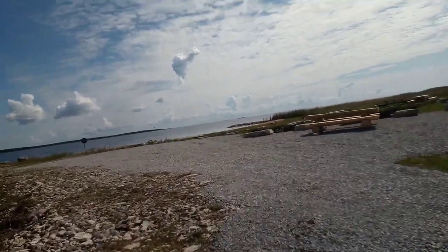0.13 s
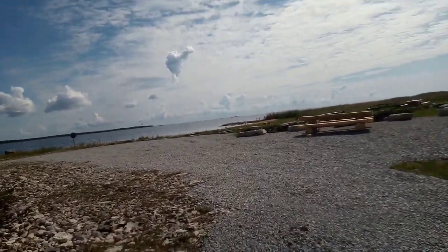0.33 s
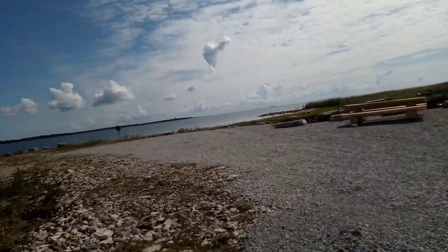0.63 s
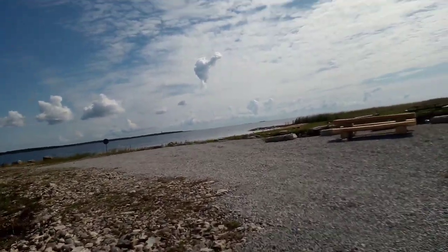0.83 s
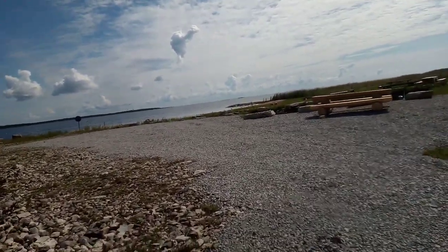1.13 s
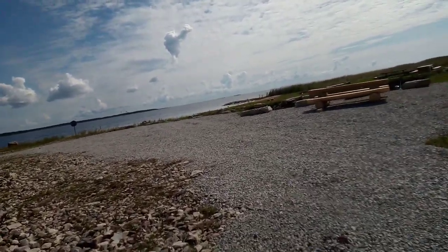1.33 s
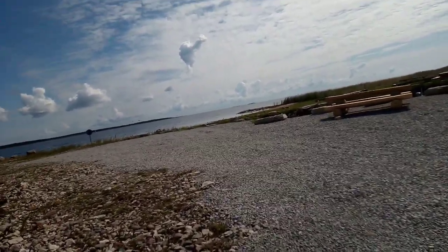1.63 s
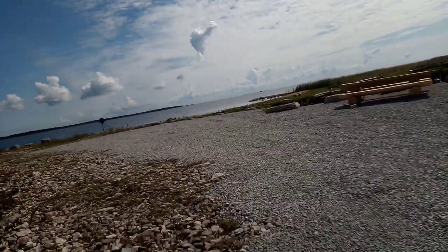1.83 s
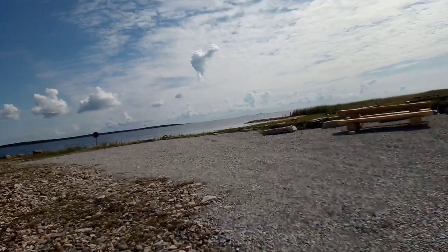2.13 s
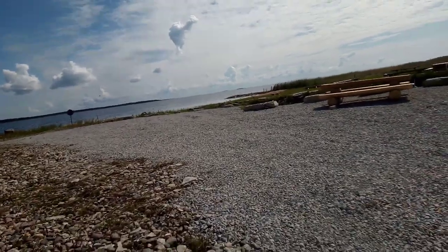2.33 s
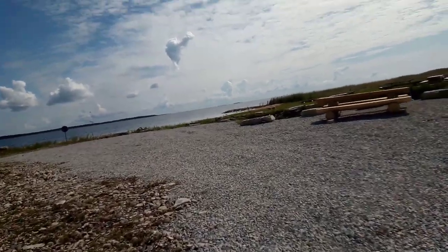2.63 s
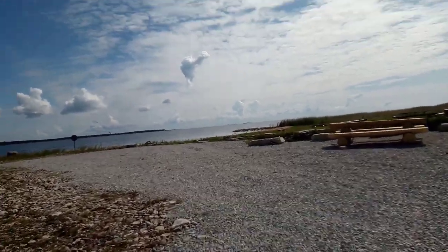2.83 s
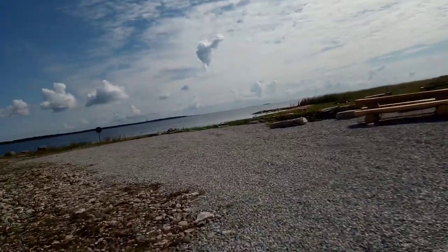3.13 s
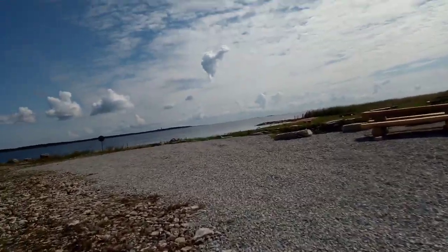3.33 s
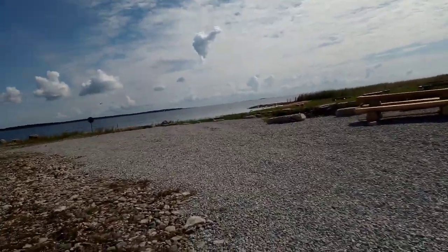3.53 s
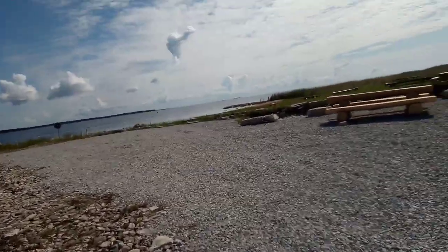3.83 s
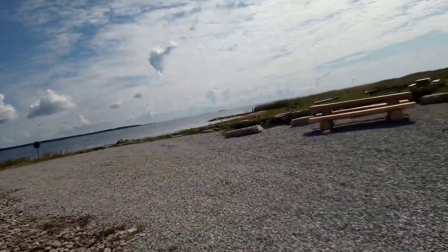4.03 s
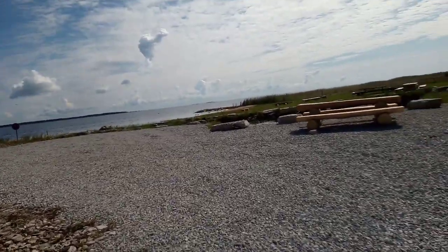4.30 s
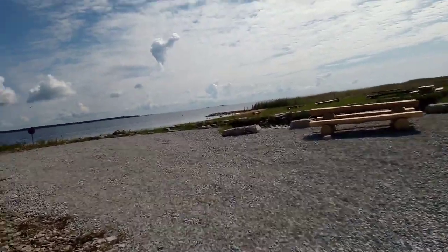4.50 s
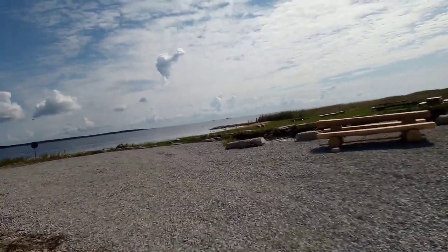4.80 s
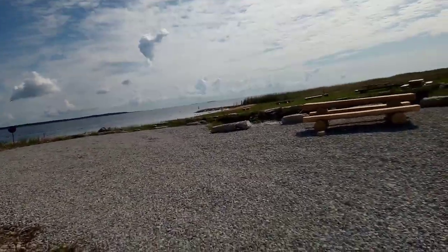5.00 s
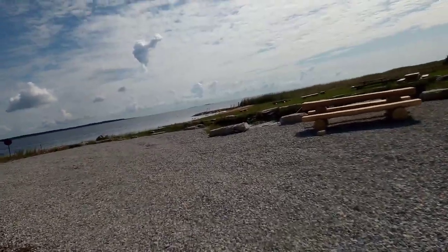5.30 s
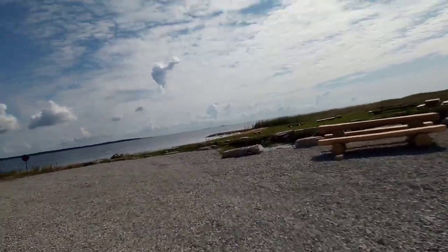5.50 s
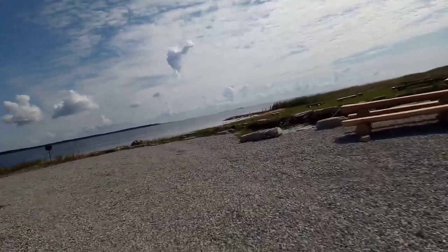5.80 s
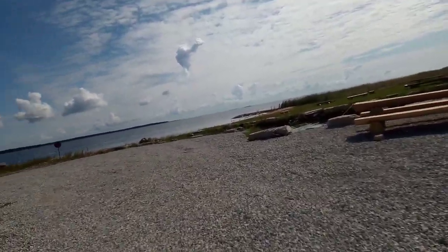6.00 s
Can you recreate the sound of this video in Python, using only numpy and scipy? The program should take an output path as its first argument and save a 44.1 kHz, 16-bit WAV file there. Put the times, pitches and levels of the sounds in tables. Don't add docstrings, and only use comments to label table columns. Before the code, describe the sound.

Gulls cry hoarsely almost without pause over a windy shore while someone walks on crunching gravel and wind thumps the microphone.

```python
import sys
import numpy as np
from scipy import signal
from scipy.fft import rfft, irfft
from scipy.io import wavfile
from scipy.ndimage import uniform_filter1d

SR = 44100
rng = np.random.default_rng(int(sys.argv[2]) if len(sys.argv) > 2 else 0)


def volts(x):
    e = np.asarray(x, float) / 20
    return 10 ** e


def inscribe(sig):
    pcm = np.round(np.clip(np.atleast_2d(sig).T, -1, 1) * 32767)
    wavfile.write(sys.argv[1], SR, pcm.astype(np.int16))


N = 271215

# (frequency [Hz], level [dB])
THROAT = [(700, -38.5), (1050, -13), (1500, -1), (1800, -1), (2250, -4), (2750, -17), (3400, -41),
          (4000, -20.5), (4500, -13), (5200, -20), (5800, -22), (6800, -25.5), (8000, -51.5), (10000, -68)]
PARTIALS_DB = [-1, 4.5, -4, -10, 2.5, -4, -3, -2, -3]
RATTLE_HZ, RATTLE_DEPTH, WAVER = 62, .62, -.016
SECOND_HZ, SECOND_DEPTH = 260, .4
BREATH_DB = -5
DIVE_S, BEAK_LAG_DB, BEAK_OPENS_S, BEAK_SHUTS_DB_S = .09, 8, .025, 16

# (start [s], length [s], top pitch [Hz], level [dB], beak opening [dB])
QUICK = [
    (.52, 0.5, 1060, -52.5, 9),
    (3.195, 0.42, 1056, -55.5, 11),
    (3.59, 0.14, 839, -58.5, 14.5),
    (5.7, 0.27, 898, -53, -6),
]
SLOW = [
    (1.9, 0.51, 1029, -54, 11),
    (3.8, 0.35, 1036, -60, -17),
    (4.43, 0.184, 829, -56, -0.5),
    (5.97, 0.25, 872, -52, 6.5),
]
GENTLE = [(1.2, 0.17, 990, -59.5, 9), (1.4, 0.27, 860, -68.5, -4.5), (1.89, 0.207, 880, -60, 13.5),
          (4.59, .2, 975, -55, 4.5), (2.38, 0.12, 700, -65, -11.5), (2.57, 0.088, 900, -58, 4),
          (3.19, 0.23, 803, -61.5, 11.5), (5.48, 0.074, 790, -65, -23), (4.07, 0.23, 1066, -58.5, 19),
          (4.72, 0.18, 895, -55, 10), (2.91, 0.087, 1070, -63.5, 4), (4.98, .17, 840, -55.5, -7),
          (5.25, 0.089, 1046, -73.5, 22), (4.28, .11, 1040, -62, 20), (5.49, .24, 1100, -64, -24)]
ARCHING = [
    (3.61, 0.15, 995, -58.5, 16.5),
    (1.07, 0.273, 1060, -52, 4.5),
    (5.13, .21, 960, -56, -8.5),
    (5.84, 0.25, 883, -57, 14),
]
DIVING = [
    (2.4, 0.18, 1070, -55, 3),
    (2.67, .3, 1090, -59, 9),
    (3.66, 0.36, 1040, -55, -2),
    (4.44, 0.17, 1130, -49.5, -4),
]
LEVEL = [(.72, 0.39, 1146, -60, 9), (2.1, 0.53, 790, -68, 13.5), (2.5, 0.24, 1157, -59.5, 8),
         (1.08, .17, 1340, -63, 17), (3.74, .14, 920, -63, 14), (4.74, .3, 920, -62, 14),
         (4.18, 0.25, 1081, -55, 9.5), (4.12, 0.33, 761, -61.5, 3), (4.88, .28, 1042, -59.5, 4.5),
         (5.76, 0.28, 968, -55, 3), (5.9, 0.32, 1202, -54, 1)]
MANNERS = [
    (QUICK, dict(climb_s=.05, climb_hz=300, dive_hz=45, sag_hz_s=300, droop_hz_s2=50,
                 swell_db_s=8, hoarse=.26)),
    (ARCHING, dict(climb_s=.09, climb_hz=80, dive_hz=3, sag_hz_s=30, droop_hz_s2=8000,
                   swell_db_s=-3, hoarse=.25)),
    (SLOW, dict(climb_s=.15, climb_hz=95, dive_hz=5, sag_hz_s=330, droop_hz_s2=400,
                swell_db_s=8, hoarse=.3)),
    (GENTLE, dict(climb_s=.045, climb_hz=15, dive_hz=5, sag_hz_s=370, droop_hz_s2=50,
                  swell_db_s=15, hoarse=.28)),
    (DIVING, dict(climb_s=.015, climb_hz=5, dive_hz=220, sag_hz_s=120, droop_hz_s2=50,
                  swell_db_s=-6, hoarse=.22)),
    (LEVEL, dict(climb_s=.06, climb_hz=40, dive_hz=5, sag_hz_s=60, droop_hz_s2=200,
                 swell_db_s=3, hoarse=.65))]

# (time [s], peak level [dB], strongest partial [Hz])
CHATTER = [(4.148, -52, 1450), (4.19, -53, 1440), (4.235, -52, 1404), (4.315, -47, 1460), (4.34, -49, 1400),
           (4.364, -46, 1397), (4.39, -49, 1420), (4.434, -42, 1473), (4.475, -50, 1600),
           (4.525, -51, 1550), (4.555, -50, 1586)]
# (time [s], peak level [dB], strongest partial [Hz])
CHUCKLE = [
    (4.7558, -40, 1500),
    (4.7762, -42, 1590),
    (4.7962, -41, 1730),
    (4.8175, -40, 1735),
    (4.8583, -38.5, 1774),
    (4.878, -38, 1750),
]
NOTE_S, NOTE_DB = 0.024, -7
# (time [s], level [dB])
COLONY = [(0, -52), (.24, -70), (.36, -62), (.43, -84), (.58, -54), (1.44, -53), (1.64, -66), (1.87, -83),
          (1.92, -51), (2.55, -52), (3.0, -62), (3.15, -87), (3.22, -51), (5.05, -52), (5.36, -72),
          (5.5, -63), (5.68, -67), (5.79, -50)]
# (start [s],
# end [s], start pitch [Hz], end pitch [Hz], level [dB])
PEEPS = [
    (1.49, 1.58, 616, 595, -71),
    (1.63, 1.724, 536, 475, -63.5),
    (1.812, 1.88, 4070, 4130, -81),
    (4.0, 4.12, 4120, 4220, -58.5),
    (4.09, 4.32, 1060, 940, -63),
    (3.63, 3.97, 1110, 1060, -66),
    (5.488, 5.51, 1600, 1560, -60),
    (5.52, 5.56, 800, 760, -74),
]

# (frequency [Hz], level [dB per Hz])
WIND_SPECTRUM = [(15, -50), (25, -49), (63, 3.5), (147, 3), (315, -6.5), (393, -23.5), (506, -25),
                 (632, -37.5), (895, -67), (1100, -85.5), (1430, -61), (2420, -120)]
# (time [s], peak level [dB], rise [s], fall [s])
GUSTS = [(0, -51.5, .1, 0.57), (0.262, -47.5, 0.069, 0.67), (0.648, -24, 0.088, 0.15),
         (0.859, -38, 0.28, 0.06), (1.08, -42, 0.16, 0.096), (1.25, -43, 0.035, 0.28),
         (1.381, -26.5, 0.13, 0.056), (1.436, -27, 0.16, 0.013), (1.545, -40, 0.12, 0.16),
         (1.86, -49, 0.67, 0.35), (2.02, -40.5, 0.21, 0.25), (2.14, -41.5, 0.24, 0.23),
         (2.292, -41, 0.26, 0.073), (2.622, -37.5, 0.12, 0.7), (2.838, -20.5, 0.025, 0.045),
         (3.044, -28, 0.26, 0.054), (3.45, -32.5, 0.21, 0.048), (3.579, -26.5, 0.045, 0.07),
         (3.77, -35.5, 0.88, 0.9), (4.18, -34.5, 0.16, 0.29), (4.441, -37.5, 0.27, 0.28),
         (4.59, -36, 0.0155, 0.22), (4.71, -31.5, 0.018, 0.019), (4.854, -29.5, 0.27, 0.16),
         (5.02, -30.5, 0.12, 0.022), (5.138, -34, 0.51, 0.29), (5.39, -38.5, 0.1, 0.038),
         (5.679, -33, 0.25, 0.26), (5.948, -33.5, 0.42, 0.061), (6.059, -42.5, 0.02, 0.18)]
CALM_DB, SHARP_AT_DB, SHARP_PER_DB = -67, -29, 1
# (time [s], added sharpness [dB])
SLAPS = [(.65, -1), (1.388, 4.5), (2.2, -10), (2.84, 3.5), (3.25, 2), (4.69, 15.5), (4.802, 12.5),
         (4.854, 8), (4.985, 11), (5.07, 6), (5.125, 2), (3.85, 0.5), (4.2, -0.5), (5.02, 2.5), (5.53, 2),
         (5.685, 18), (5.726, 8), (5.62, 4), (6.03, 37)]
SLAP_S = 0.027
# (time [s], peak level [dB], swing [Hz])
THUMPS = [(0.614, -19, 222), (0.649, -16, 101.3), (0.678, -21, 112), (1.064, -34, 183), (1.261, -31, 117),
          (1.292, -22.5, 125), (1.351, -19.5, 160.5), (1.374, -22, 115), (1.39, -18.5, 157),
          (1.428, -23, 116), (1.539, -33, 159), (2.127, -39.5, 172), (2.268, -32.5, 144), (2.803, -14, 153),
          (2.83, -17.5, 142), (2.913, -22, 168), (2.968, -20.5, 177), (3.027, -23.5, 174), (3.147, -31, 92),
          (3.559, -20.5, 172.5), (3.712, -25, 152), (3.75, -22.5, 125), (3.784, -26.5, 91),
          (3.816, -22.5, 153), (3.85, -18.5, 180), (4.077, -22, 142), (4.195, -21, 190),
          (4.283, -26.5, 117), (4.337, -27, 126), (4.581, -27.5, 147), (4.658, -29, 172),
          (4.697, -25.5, 136), (4.719, -21.5, 140), (4.786, -17, 176), (4.846, -14, 201), (4.87, -20, 112),
          (4.947, -29, 161), (4.978, -23, 140), (5.015, -16, 148), (5.062, -24.5, 221), (5.12, -19, 91),
          (5.168, -26, 116), (5.652, -27, 175), (5.68, -22.5, 226), (5.722, -22.5, 132), (5.782, -30.5, 92),
          (5.855, -22.5, 202), (5.909, -30, 123), (5.948, -24.5, 182), (6.022, -43, 109)]
THUMP_TURNS, THUMP_DB, THUMP_SAG = 0.61, -3, 0.15

# (frequency [Hz], level [dB per Hz])
GRIT = [(1470, -37), (2500, -46), (2770, -12), (4080, -10), (4430, -4), (5880, 3.5), (6430, 6.5),
        (7590, 1.5), (8480, -15.5), (10100, -8.5), (13000, -19.5)]
# (frequency [Hz], level [dB])
COARSE = [(450, -8), (700, -10.5), (1000, 1), (1500, 6), (2100, -3.5), (2700, -19.5), (3500, -8.5),
          (4200, -16.5), (5800, -11.5), (7500, -21.5), (8500, -45)]
# (time
# [s], length [s], coarse stones [dB], fine grit [dB], finest dust [dB])
STEPS = [(0.019, 0.055, -45, -63.5, -48.5), (0.117, 0.085, -54, -76.5, -69.5),
         (0.342, 0.063, -59.5, -97, -80), (0.784, 0.17, -54, -75.5, -71), (1.093, 0.034, -78, -71.5, -88),
         (1.404, 0.15, -54, -77.5, -66), (1.437, 0.048, -59, -75, -68), (1.517, 0.054, -57, -93, -84),
         (1.682, 0.11, -61.5, -108, -92), (1.95, 0.078, -54.5, -76, -80.5),
         (2.046, 0.087, -48.5, -74, -66.5), (2.564, 0.063, -51, -78.5, -72.5),
         (2.711, 0.1, -51, -71.5, -76), (2.984, 0.039, -55, -85, -90), (3.298, 0.067, -50, -83, -86),
         (3.34, 0.036, -41.5, -71, -84), (3.45, 0.11, -53.5, -88, -78), (4.002, 0.098, -53.5, -80.5, -97),
         (4.08, 0.071, -55.5, -81.5, -99), (4.717, 0.079, -49, -80, -80), (4.765, 0.052, -48, -73, -81),
         (4.847, 0.15, -57, -101, -90), (5.422, 0.082, -57.5, -100, -86), (5.445, 0.017, -50, -92, -90),
         (6.073, 0.12, -49.5, -85, -84)]
PRESS_SHARE, STONES_LINGER, DUST_REST_DB = 0.8, 1.19, -86
# (time [s], peak level [dB], ring [Hz], treble [dB])
DRY = [(.008, -41, 1540, -26), (0.061, -49, 1680, -40.5), (0.089, -53, 1380, -44.5),
       (0.112, -42, 1540, -45), (1.287, -63, 1760, -52.5), (1.378, -37, 760, -53), (1.94, -45, 1970, -56.5),
       (2.028, -31.5, 1110, -71), (2.561, -38, 1390, -65), (2.674, -57, 1360, -49.5),
       (2.983, -36, 1340, -40), (6.057, -27.5, 1810, -62)]
# (time [s], peak level [dB], ring
# [Hz], treble [dB])
DULL = [(0.294, -23.5, 910, -62), (0.347, -44, 1620, -69), (0.643, -33, 1770, -56.5),
        (0.768, -38, 1150, -60), (2.984, -43, 2900, -60), (3.03, -52, 1500, -80), (3.327, -28, 1700, -55),
        (1.664, -41.5, 1640, -79), (1.789, -49, 1220, -83), (2.135, -45, 1050, -73),
        (3.291, -21.5, 660, -46), (3.31, -27.5, 1700, -46), (3.334, -18.5, 1320, -48),
        (3.342, -26.5, 1520, -55), (3.351, -25, 920, -55), (.792, -32, 1020, -59),
        (1.441, -29.5, 1400, -61), (1.556, -52, 1620, -74), (6.088, -34, 765, -65), (3.431, -29, 1770, -67),
        (3.465, -39, 1970, -52), (3.988, -36.5, 1460, -46), (4.016, -31, 1420, -43.5),
        (4.664, -35.5, 1810, -52.5), (4.726, -36, 925, -34), (4.763, -32, 1580, -32.5),
        (5.378, -44, 1530, -85), (5.408, -40, 1170, -62), (5.436, -32, 680, -60), (5.607, -47, 1110, -72),
        (3.981, -46, 1400, -49), (3.996, -46, 1500, -47), (1.078, -62, 1900, -50), (1.099, -62, 1900, -50),
        (6.141, -38, 1700, -48)]
DRY_TOP_DB, DULL_TOP_DB = -3, -21
PORT_HZ = 15400

# (frequency [Hz], level [dB per Hz])
HISS = [(500, -112), (1000, -110), (1600, -107), (2500, -120), (3200, -122), (3700, -118), (4400, -122),
        (6000, -121), (7500, -126), (8500, -129), (10500, -131), (13000, -133), (15000, -127),
        (16000, -128)]


def read(points, hz):
    p = np.array(points)
    return np.interp(np.log(hz), np.log(p[:, 0]), p[:, 1])


def unit(x):
    return x / np.sqrt(np.mean(x ** 2))


def colour(x, points):
    hz = np.arange(1, 2050) * SR / 4096
    below = np.maximum(np.log2(points[0][0] / hz), 0)
    db = read(points, hz) - 30 * below - 60 * (hz > points[-1][0])
    cep = irfft(db * np.log(10) / 20)
    cep[1:2048] *= 2
    cep[2049:] = 0
    response = irfft(np.exp(rfft(cep)))[:2048]
    return signal.fftconvolve(x, response)[:len(x)]


def band(x, hz, octaves):
    edges = hz * 2 ** (np.array([-.5, .5]) * octaves)
    return signal.sosfilt(signal.butter(3, edges, "band", fs=SR, output="sos"), x)


def walk(rate, size=N):
    k = max(int(SR / rate), 1)
    held = np.repeat(rng.standard_normal(size // k + 1), k)
    return 1.3 * uniform_filter1d(uniform_filter1d(held, k), k)[:size]


def swells(s, db, rise, fall, rest_db):
    t = np.arange(0, N, 32) / SR
    power = volts(2 * rest_db)
    for s0, peak, up, down in zip(s, db, rise, fall):
        power = power + volts(2 * (peak - 20 * np.maximum((s0 - t) / up, (t - s0) / down)))
    return np.interp(np.arange(N) / SR, t, 10 * np.log10(power))


def gulls():
    near = np.zeros(N)
    for rows, manner in MANNERS:
        for s, *row in rows:
            start = int(s * SR)
            sound = cry(*row, **manner)[:N - start]
            near[start:][:len(sound)] += sound
    n = int(NOTE_S * SR)
    for s, db, hz in CHATTER + CHUCKLE:
        note = np.hanning(n) * voice(np.full(n, hz / 2), -6.0, 0.22)
        near[int(s * SR):][:n] += volts(db + NOTE_DB) * note
    crowd = 0
    for hz in (700, 800, 910, 1020):
        crowd = crowd + volts(3 * walk(4)) * voice(hz * (1 + .07 * walk(5)), -5., .5)
    colony_s, colony_db = np.transpose(COLONY)
    crowd_db = np.interp(np.arange(N) / SR, colony_s, colony_db) - 9
    out = colour(near, THROAT) + volts(crowd_db) * unit(colour(crowd, THROAT))
    t = np.arange(SR // 8) / SR
    echo = rng.standard_normal(len(t)) * np.exp(-np.log(1000) * t / .1)
    return out + volts(-32) * signal.fftconvolve(out, echo)[:N]


def cry(length, hz, db, beak_db, climb_s, climb_hz, dive_hz, sag_hz_s, droop_hz_s2, swell_db_s, hoarse):
    t = np.arange(int(length * SR)) / SR
    after = np.maximum(t - climb_s, 0)
    hz = hz - climb_hz * np.maximum(1 - t / climb_s, 0) ** 2
    hz = hz - dive_hz * (1 - np.exp(-after / DIVE_S))
    hz = hz - sag_hz_s * after - droop_hz_s2 * after ** 2
    beak_db = beak_db - BEAK_LAG_DB * np.exp(-t / BEAK_OPENS_S) - BEAK_SHUTS_DB_S * after
    edges = signal.windows.tukey(len(t), .055 / length)
    return volts(db + swell_db_s * t) * voice(hz, beak_db, hoarse) * edges


def voice(hz, beak_db, hoarse):
    n = len(hz)
    rattle_hz = RATTLE_HZ * (1 + .1 * rng.standard_normal() + .11 * walk(35, n))
    rattle = 2 * np.pi * (np.cumsum(rattle_hz) / SR + rng.random())
    second = 2 * np.pi * np.cumsum(SECOND_HZ * (1 + .2 * walk(12, n) + .25 * walk(150, n))) / SR
    waver = WAVER * np.sin(rattle) + .045 * hoarse * walk(120, n) + .006 * walk(25, n)
    turn = 2 * np.pi * np.cumsum(hz * (1 + waver)) / SR
    hoarse = hoarse + (.9 - hoarse) * np.exp(-np.arange(n) / (.018 * SR))
    air = rng.standard_normal(n)
    breath = band(air, 1700, 1.8)
    breath = breath + volts(beak_db + 2) * band(air, 5600, 1.3)
    breath = breath + volts(beak_db + 11) * band(air, 4650, .3)
    out = volts(BREATH_DB) * hoarse * breath
    for k, db in enumerate(PARTIALS_DB, 1):
        share = np.minimum(hoarse * (.5 + .14 * k), 1)
        smear_hz = 140 + 120 * k
        blur = 1 - share + share * (walk(smear_hz, n) + 1j * walk(smear_hz, n))
        open_db = beak_db * np.clip((k * hz - 2300) / 1200, 0, 1)
        level = volts(db + open_db + .2 * k * walk(15, n))
        out = out + level * np.imag(blur * np.exp(1j * k * turn))
    chop = (1 + RATTLE_DEPTH * np.cos(rattle)) * (1 + SECOND_DEPTH * np.cos(second))
    return out * chop * volts(.8 * walk(60, n))


def peeps():
    out = np.zeros(N)
    for s0, s1, hz0, hz1, db in PEEPS:
        a, b = int(s0 * SR), int(s1 * SR)
        hz = np.linspace(hz0, hz1, b - a) + 25 * walk(93, b - a)
        tone = np.sin(2 * np.pi * np.cumsum(hz) / SR)
        out[a:b] += volts(db) * tone * signal.windows.tukey(b - a, .4)
    return out


def gravel():
    s, length, coarse_db, grit_db, dust_db = np.transpose(STEPS)
    press = PRESS_SHARE * length
    coarse_db = swells(s, coarse_db, press, STONES_LINGER * length, -100)
    grit_db = swells(s, grit_db, press, length, -108)
    dust_db = swells(s, dust_db, press, length, DUST_REST_DB)
    fine, rough = [rng.standard_normal(N) * volts(2.4 * rng.exponential(size=N)) * volts(3.5 * walk(90))
                   for _ in range(2)]
    grit, crunch = unit(colour(fine, GRIT)), 0
    for hz in 2600 * 2 ** np.arange(0, 2.5, .4):
        crunch = crunch + volts(4.0 * walk(45)) * band(grit, hz, .4)
    out = volts(grit_db + 13.0) * crunch
    out += volts(dust_db - 5.0) * unit(band(fine, PORT_HZ, 0.12))
    out += volts(coarse_db + 1.5) * unit(colour(rough, COARSE))
    return out + stones()


def stones():
    out, treble_ticks, top_ticks = np.zeros((3, N))
    t = np.arange(SR // 20) / SR
    shape = (1 - np.exp(-t / 0.00061)) * np.exp(-np.log(1000) * t / 0.01)
    for rows, top_db in [(DRY, DRY_TOP_DB), (DULL, DULL_TOP_DB)]:
        for s, db, hz, treble_db in rows:
            a = int(s * SR)
            knock = np.sin(2 * np.pi * hz * t) + 0.62 * np.sin(2 * np.pi * 0.41 * hz * t)
            knock = (volts(db) * knock * shape)[:N - a]
            out[a:a + len(knock)] += knock
            tick = rng.standard_normal(150) * np.exp(-np.arange(150) / 113.0)
            treble_ticks[a:a + 150] += volts(treble_db - 1.0) * tick
            top_ticks[a:a + 150] += volts(treble_db + top_db) * tick
    return out + colour(treble_ticks, GRIT) + band(top_ticks, PORT_HZ, 0.11)


def thumps():
    out = np.zeros(N)
    for s, db, hz in THUMPS:
        start = int(s * SR)
        turns = np.arange(min(int(8 * SR / hz), N - start)) * hz / SR
        u = turns / THUMP_TURNS
        swing = np.sin(2 * np.pi * turns ** (1 - THUMP_SAG / 2))
        out[start:][:len(u)] += volts(db + THUMP_DB) * u * np.exp(1 - u) * swing
    return out


def wind():
    gust_db = swells(*np.transpose(GUSTS), CALM_DB)
    t = np.arange(N) / SR
    slap_db = sum(db * np.exp(-((t - s) / SLAP_S) ** 2) for s, db in SLAPS)
    sharp_db = SHARP_PER_DB * (gust_db - SHARP_AT_DB) + slap_db - 3.5
    s, db, _ = np.transpose(THUMPS)
    eddy_db = swells(s + 0.0075, db, 0.014 + 0 * s, 0.042 + 0 * s, -69.5)
    flare_db = np.clip(eddy_db - gust_db - 10, -7, 4)
    out, throb = 0, walk(36)
    for hz in 30 * 2 ** np.arange(0, 5.4, .5):
        reach = np.clip(np.log2(hz / 130) / 1.308, 0, 2.0)
        flutter_db = (2 + 1.2 * reach) * throb + 1.5 * walk(12)
        flutter_db = flutter_db + np.minimum(reach + .3, 1.3) * flare_db
        db = read(WIND_SPECTRUM, hz) + reach * (sharp_db + 8.5) + flutter_db
        out = out + volts(db) * band(rng.standard_normal(N), hz, 0.54)
    return volts(gust_db + 20.5) * out


def hiss():
    return np.sqrt(SR / 2) * colour(rng.standard_normal(N), HISS)


def scene():
    return (gulls() + peeps() + gravel() + thumps() + wind() + hiss())[None]


def top_cut(x):
    return signal.sosfilt(signal.butter(12, 16660, fs=SR, output="sos"), x)


def record(dry):
    return top_cut(dry)


dry = scene()
out = record(dry)
inscribe(out)
```